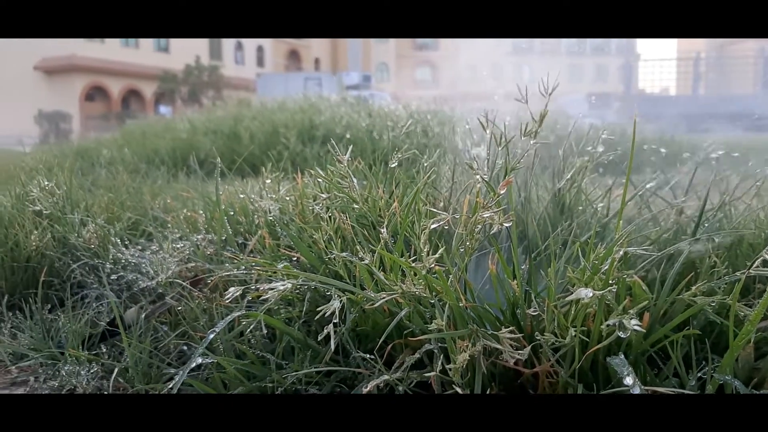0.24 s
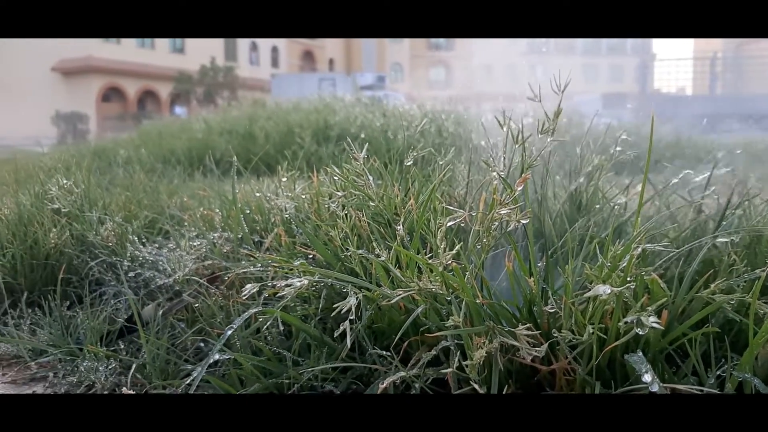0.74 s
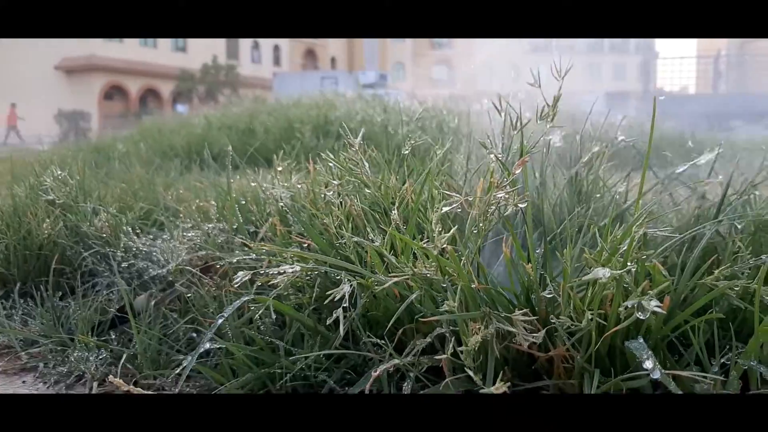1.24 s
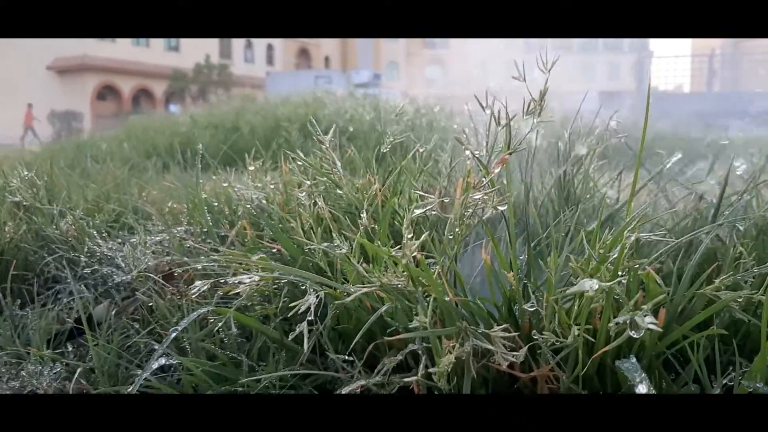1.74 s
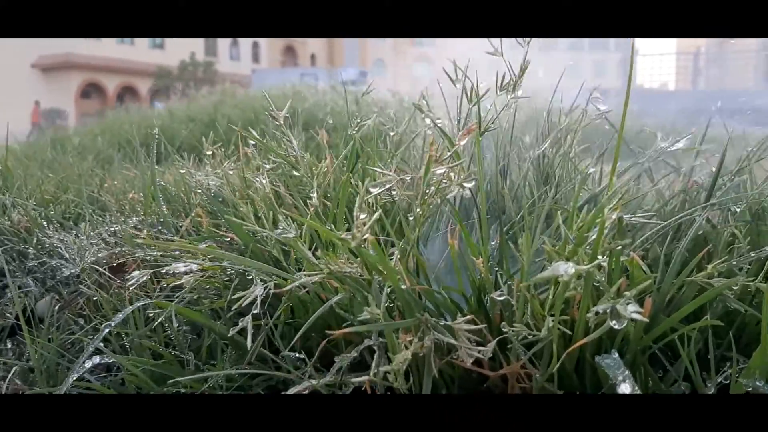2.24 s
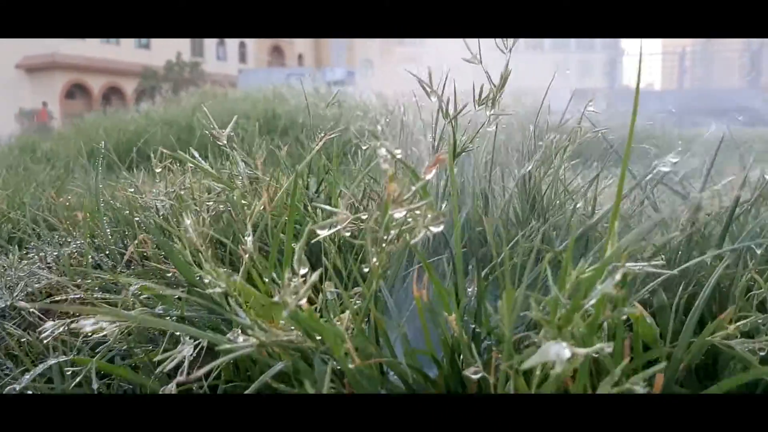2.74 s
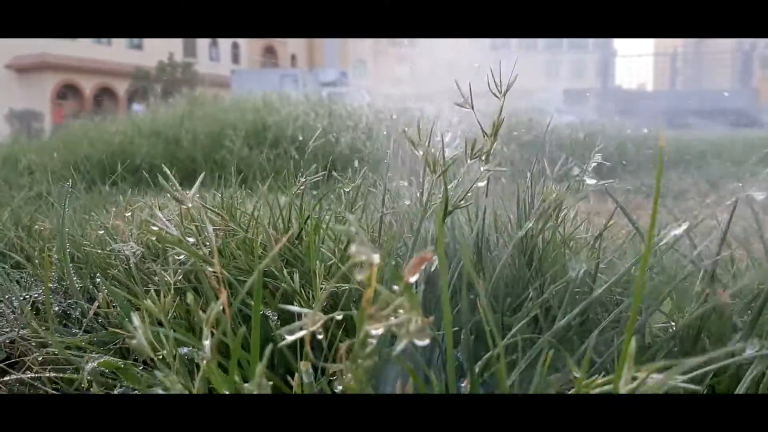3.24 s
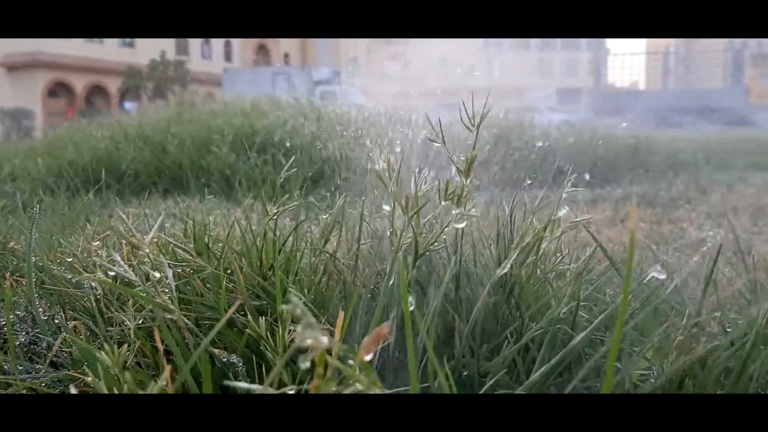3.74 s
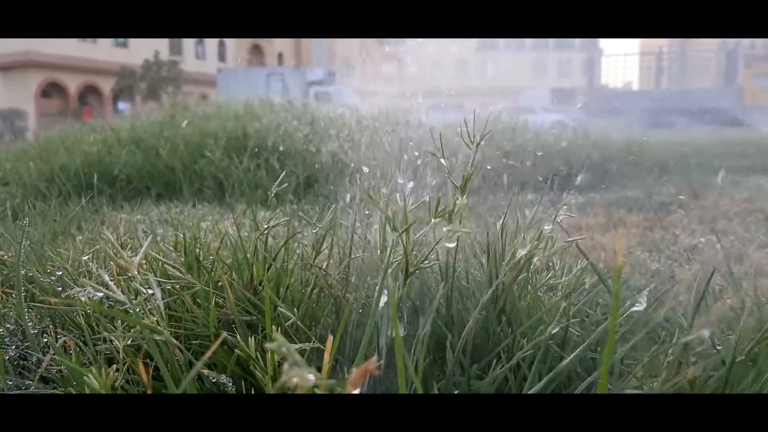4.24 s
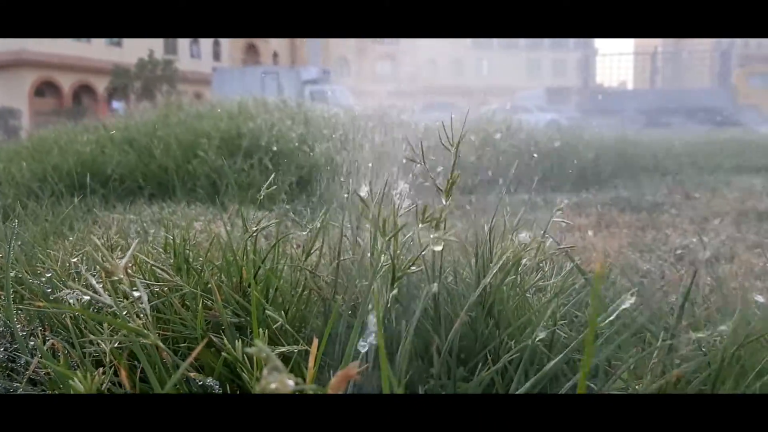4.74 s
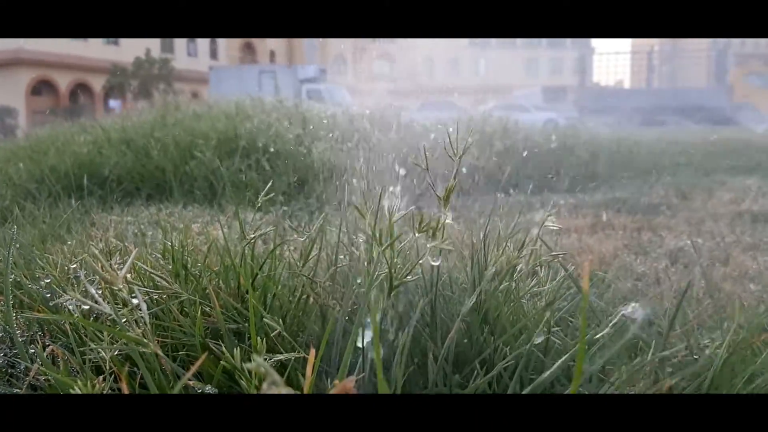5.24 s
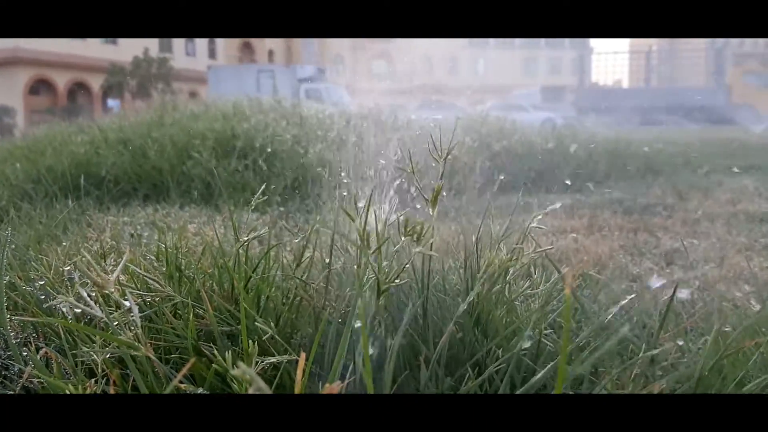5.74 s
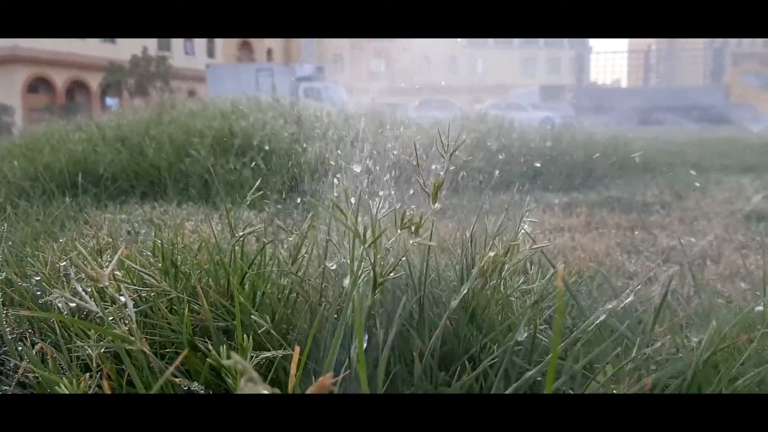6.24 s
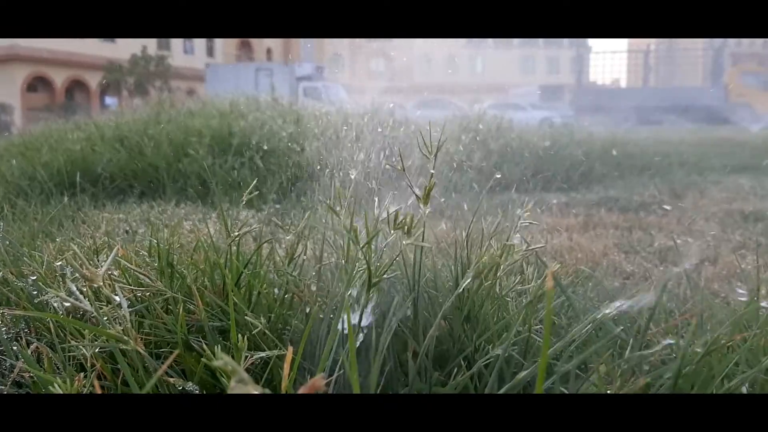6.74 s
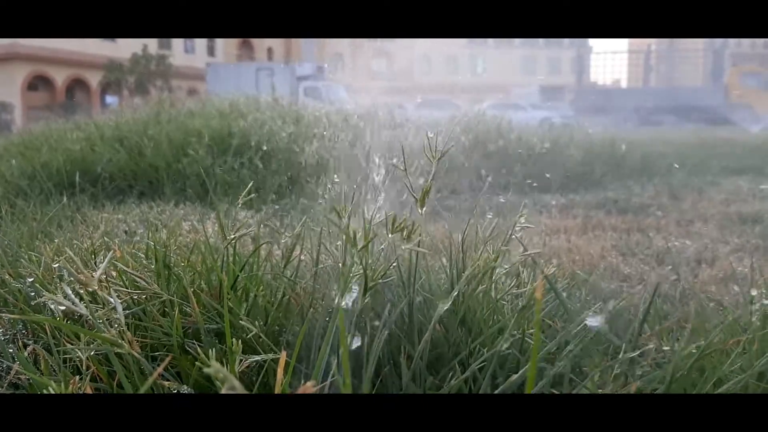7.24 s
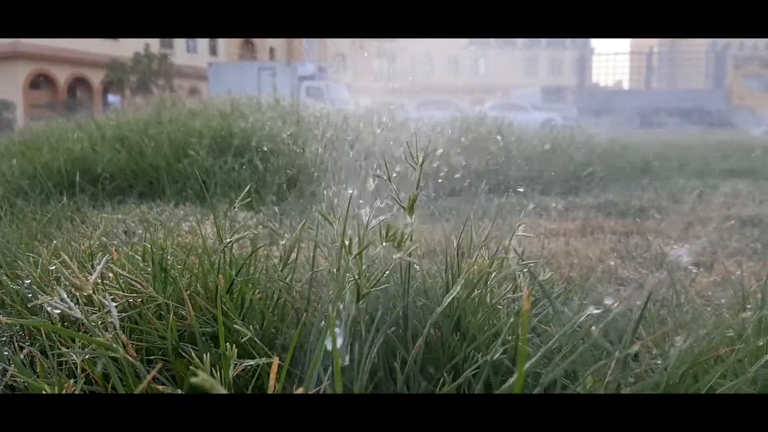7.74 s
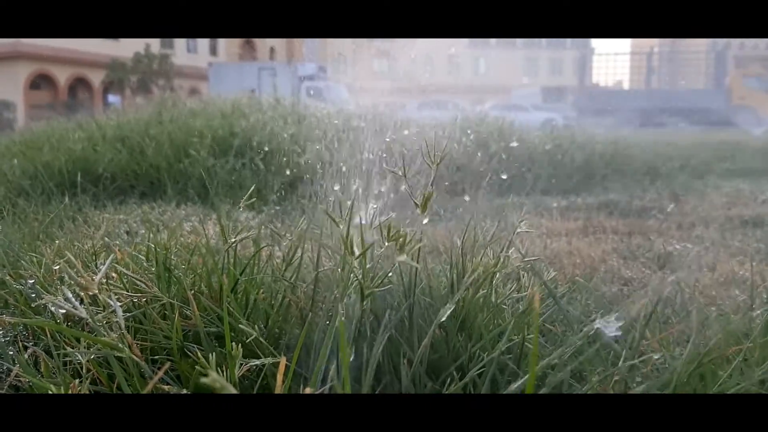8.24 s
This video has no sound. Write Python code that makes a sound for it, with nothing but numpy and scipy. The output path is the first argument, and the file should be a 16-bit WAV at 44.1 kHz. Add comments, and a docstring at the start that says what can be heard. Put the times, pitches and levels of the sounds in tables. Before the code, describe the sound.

Constant fine water spray and soft patter on wet turf, opening up after three seconds; a bird chirps twice in short series, traffic faintly rumbling.

```python
"""Lawn sprinkler heard from wet grass

A sprinkler throws a steady fan of spray: filtered noise with random impacts makes its hiss.
The microphones rise from behind a tuft of grass; drops patter on the lawn and near blades in noise washes.
A bird calls in two short series of swept, buzzing tones with echoes.
Traffic is a low noise rumble; an idling engine and one passing car are wavering tones."""
import sys
import numpy as np
from scipy import signal
from scipy.fft import rfft, irfft
from scipy.io import wavfile
from scipy.ndimage import uniform_filter1d

SR = 44100
rng = np.random.default_rng(int(sys.argv[2]) if len(sys.argv) > 2 else 0)


def put_to_file(sound):
    """Save the sound as 16-bit audio at rate SR, in the file named by the first command-line argument."""
    columns = np.atleast_2d(sound).T  # one column per channel
    safe = np.clip(columns, -1, 1)
    whole_steps = np.round(safe * 32767)
    wavfile.write(sys.argv[1], SR, whole_steps.astype(np.int16))


N = 373968
TIME = np.arange(N) / SR

# microphone move: (time [s], hidden behind the grass [0-1], nearness to the blade tips [0-1])
MOVE = [(0, 1, 0), (1.8, 0.93, 0.2), (2.45, 0.76, 0.65), (2.75, 0.46, 0.55), (3.0, 0.13, 0.86),
        (3.4, 0, 0.73), (3.9, 0.06, 0.26), (4.5, 0.05, 0.14), (8.48, 0, 0.06)]


def gain_of(db):
    """Decibels to amplitude."""
    return 10 ** (np.asarray(db) / 20)


def evened(x):
    """Scales to rms 1."""
    return x / np.sqrt(np.mean(x ** 2) + 1e-20)


def read(points, hz):
    """Spectrum table interpolated on a log-frequency axis."""
    f, value = np.transpose(points)
    return np.interp(np.log(hz + 1), np.log(f + 1), value)


def follow(rows, t):
    """Columns of a curve table at times t."""
    s, *columns = np.transpose(rows)
    return [np.interp(t, s, c) for c in columns]


def hidden(t):
    """How far the grass hides the sprinkler, 0-1."""
    return np.clip(follow(MOVE, t)[0], 0, 1)


def tip_nearness(t):
    """Nearness to the blade tips, 0-1."""
    return follow(MOVE, t)[1]


def balance(right_db):
    """Left and right gains; the right is right_db above the left."""
    return gain_of(right_db * np.array([[-.5], [.5]]))


def bumps(rows, hz):
    """Peaks and dips of a table (centre [Hz], width at half height [Hz], level [dB]), in dB."""
    return sum(db * .5 ** ((2 * (hz - f) / width) ** 2) for f, width, db in rows)


def waver(slow_hz, fast_hz):
    """Random motion of rms 1, with equal power in every octave between two rates."""
    hz = np.fft.rfftfreq(N, 1 / SR) + 1e-3
    shape = 1 / np.sqrt(hz * (1 + (slow_hz / hz) ** 4) * (1 + (hz / fast_hz) ** 4))
    return evened(irfft(rfft(rng.standard_normal(N)) * shape, N))


def patches(hz, t, wide_hz, long_s):
    """Random lumps of rms 1 over frequency and time, for uneven noise."""
    wide_bins = max(1, round(wide_hz / np.ptp(hz) * len(hz)))
    long_frames = max(1, round(long_s / t[1]))
    field = rng.standard_normal((len(hz), len(t)))
    field = uniform_filter1d(field, wide_bins, axis=0)
    return evened(uniform_filter1d(field, long_frames, axis=1))


def drops(per_s, spread_db, share):
    """Two unrelated streams of separate impacts in a wash of countless small ones (noise)."""
    size = gain_of(spread_db * np.minimum(rng.exponential(1, (2, N)), 4))
    sign = rng.choice([-1, 1], (2, N))
    impacts = size * sign * (rng.random((2, N)) < per_s / SR)
    return rng.standard_normal((2, N)) + share * evened(impacts)


def ports(streams, colour_db, same, lead_ms, size):
    """Two streams become a left-right pair; colour, likeness and the left's lead are rules of (Hz, s)."""
    overlap = size - size // 4
    hz, t, (a, b) = signal.stft(streams, SR, nperseg=size, noverlap=overlap)
    hz = hz[:, None]
    c = np.clip(same(hz, t), 0, 1)
    delay = np.exp(-2j * np.pi * hz * lead_ms(t) / 1000)
    right = (c * a + np.sqrt(1 - c ** 2) * b) * delay
    z = np.array([a, right]) * gain_of(colour_db(hz, t))
    return evened(signal.istft(z, SR, nperseg=size, noverlap=overlap)[1][:, :N])


def rumble_colour(hz, t, boom_hz=75, patchy_db=1.65, swell_db=1.3, rise_db_per_s=0.53):
    """Road rumble in slow lumps; its deep boom swells and ebbs, growing a little as traffic draws nearer."""
    # (frequency [Hz], level per Hz [dB])
    road = [(18, -24), (36, -23), (50, 0), (68, -2), (82, -1.5), (104, 0.5), (135, -6), (190, -6.5),
            (265, -15), (330, -12), (520, -23), (1200, -38.5)]
    swell = np.interp(t, TIME, waver(slow_hz=0.23, fast_hz=1.0))
    boom = swell_db * swell + rise_db_per_s * (t - t.mean())
    boom = boom / (1 + (hz / boom_hz) ** 6)
    return read(road, hz) + boom + patchy_db * patches(hz, t, wide_hz=35, long_s=.25)


def traffic(right_db=1.0, unsteady_hz=1.84, flutter_db=2):
    """A far, nearly mono rumble and the wavering firing tone of an idling engine, with its octave."""
    # left-right likeness: (frequency [Hz], likeness [0-1])
    likeness = [(30, 1), (100, 0.87), (200, 0.73), (450, 0.53), (1000, 0.51)]
    # the hum's octave: (time [s], level [dB])
    octave = [(0, -50.5), (2, -62), (6.0, -57), (7.4, -54.5), (8.2, -46.5)]
    street_db, firing_hz, firing_db = -38.5, 97.55, -49
    noise = rng.standard_normal((2, N))
    rumble = ports(noise, rumble_colour, lambda hz, t: read(likeness, hz), lambda t: 0, size=4096)
    hz = firing_hz + unsteady_hz * waver(slow_hz=0.65, fast_hz=8.5)
    angle = 2 * np.pi * np.cumsum(hz) / SR
    hum = gain_of(firing_db) * np.sin(angle)
    hum = hum + gain_of(follow(octave, TIME)[0]) * np.sin(2 * angle)
    hum = np.sqrt(2) * hum * gain_of(flutter_db * waver(slow_hz=0.55, fast_hz=6.0))
    return (rumble * gain_of(street_db) + hum) * balance(right_db)


def passing_car(unsteady_hz=0.57, flutter_db=2):
    """A far car drives by: its exhaust note sinks by Doppler shift and is loudest as it passes."""
    nearest_s, span_s = 3.65, 0.96  # span: time to cover its nearest distance
    exhaust_hz, doppler_hz, nearest_db = 104.6, 13, -48
    along = (TIME - nearest_s) / span_s
    distance = np.sqrt(1 + along ** 2)  # nearest = 1
    hz = exhaust_hz - doppler_hz * along / distance + unsteady_hz * waver(slow_hz=0.64, fast_hz=12)
    level_db = nearest_db + flutter_db * waver(slow_hz=0.92, fast_hz=14)
    return np.sqrt(2) * gain_of(level_db) / distance * np.sin(2 * np.pi * np.cumsum(hz) / SR)


def bird(left_db=6, direct=0.46, wet=0.67):
    """Each chirp slips down onto a held, buzzing note; most then fall in pitch as the buzz fades; echoes."""
    # one row a call, level ahead of the direct/echo mix:
    # (start [s], length [s], final pitch fall [Hz], buzz depth [Hz], level [dB])
    chirps = [(2.445, .1, 0, 140, -42), (2.83, .1, 120, 140, -41.8), (3.262, .082, 60, 130, -43),
              (3.64, .095, 30, 150, -43), (4.06, .08, 500, 200, -48), (7.292, .113, 950, 340, -41.3),
              (7.672, .105, 850, 320, -41.8), (8.062, .098, 850, 350, -41), (8.432, .1, 900, 200, -41.5)]
    held_hz, slip_hz, trill_hz = 2970, 520, 130  # slip: start above the held pitch
    slip_end, hold_end = .3, .66  # share of the call's length
    voice, rasp = np.zeros(N), waver(slow_hz=80, fast_hz=200)
    trill_rate_hz = trill_hz * (1 + .1 * waver(slow_hz=5, fast_hz=40))
    trill = np.sin(2 * np.pi * np.cumsum(trill_rate_hz) / SR)
    for s, length, fall_hz, buzz_hz, level_db in chirps:
        part = (TIME >= s) & (TIME < s + length)
        u = (TIME[part] - s) / length
        slip = np.clip(1 - u / slip_end, 0, 1)
        fall = np.clip((u - hold_end) / (1 - hold_end), 0, 1)
        buzz = (1 - slip) * (1 - fall ** 2) * (trill[part] + .5 * rasp[part])
        hz = held_hz + slip_hz * slip - fall_hz * fall + buzz_hz * buzz
        swell = np.sin(np.pi * u ** 1.25) ** .7 * (1 + .3 * buzz)
        tone = np.sin(2 * np.pi * np.cumsum(hz) / SR)
        voice[part] += gain_of(level_db) * np.sqrt(2) * swell * tone
    t, t60_s = TIME[:SR // 2], .1
    sparse = rng.random((2, len(t))) < .04
    taps = rng.standard_normal((2, len(t))) * sparse * gain_of(-60 * t / t60_s)
    taps = taps / np.linalg.norm(taps[0])
    echo = signal.fftconvolve(voice[None], taps, axes=1)[:, :N]
    return (direct * voice + wet * echo) * balance(-left_db)


def hollow(hz, t, ring_hz=1495, shift_hz=60, width_hz=130, ring_db=4):
    """One hollow resonance that rises a little in pitch near the blade tips, in dB."""
    return bumps([(ring_hz + shift_hz * tip_nearness(t), width_hz, ring_db)], hz)


def lawn(right_db=2, lead_ms=0.12, patchy_db=2.5):
    """Spray lands on the turf in a soft, lumpy wash with one hollow resonance."""
    # (frequency [Hz], level per Hz [dB])
    turf = [(150, -25), (450, -2), (700, -3.5), (1150, -2.5), (1350, -2), (1640, -1), (2000, -2.5),
            (2200, -1.5), (3000, -30), (5000, -20)]
    # left-right likeness: (frequency [Hz], likeness [0-1])
    likeness = [(200, 0.49), (550, 0.62), (1500, 0.63), (2000, 0.18), (2600, 0.22)]
    # the wash's upper edge: (time [s], level [dB])
    edge = [(3.5, -0.5), (5, -1.5), (6.2, -1), (7.2, 2.5), (8.2, 3.5)]
    edge_hz, edge_width_hz = 2400, 960
    open_db, tuft_loss_db = -41, 1.4

    def colour(hz, t):
        upper_edge = bumps([(edge_hz, edge_width_hz, follow(edge, t)[0])], hz)
        lumps = patchy_db * patches(hz, t, wide_hz=110, long_s=0.09)
        return read(turf, hz) + hollow(hz, t) + upper_edge + lumps

    streams = drops(per_s=450, spread_db=4.5, share=0.3)
    wash = ports(streams, colour, lambda hz, t: read(likeness, hz),
                 lambda t: lead_ms * (1 - hidden(t)), size=1024)
    return wash * gain_of(open_db - tuft_loss_db * hidden(TIME)) * balance(right_db)


def blades(level_db=-44, same=0.97, in_open=0.04, patchy_db=3.0):
    """Drops tick on the tuft straight ahead, fading as the microphones clear it."""
    # (frequency [Hz], level per Hz [dB])
    ticks = [(1600, -11), (2300, -6), (2750, 0), (3100, -4.5), (3500, -8), (4300, -2.5), (5200, -35)]

    def colour(hz, t):
        return read(ticks, hz) + patchy_db * patches(hz, t, wide_hz=250, long_s=0.041)

    streams = drops(per_s=550, spread_db=-2.5, share=0.38)
    patter = ports(streams, colour, lambda hz, t: same, lambda t: 0, size=512)
    nearness = in_open + (1 - in_open) * hidden(TIME)
    return patter * nearness * gain_of(level_db)


def hiss_colour(hz, t, mist_db=0.84, flicker_db=3.6):
    """Each port's open hiss, dulled behind the grass and brightened at its tips; its low edge flickers."""
    # open hiss in each microphone port: (frequency [Hz], level per Hz [dB])
    left = [(1500, -25), (3300, -17.5), (3850, -14.5), (5000, -7), (5800, -2.5), (6700, -9.5), (7950, -6),
            (8600, -18), (10300, -12.5), (11500, -7.5), (12450, -4), (14000, -7), (15700, -14)]
    right = [(1800, -28), (3100, -18.5), (4080, -11.5), (4300, -7.5), (4650, 0), (5620, 3), (6250, -3),
             (6750, -1.5), (7550, -13.5), (8100, -32), (9600, -25.5), (11100, -15.5), (12000, -11),
             (12700, -25), (15700, -16.5)]
    # change behind the grass, change at the blade tips: (frequency [Hz], level [dB])
    screen = [(3800, 0.5), (4800, -6.5), (5700, -7.5), (6400, -2), (7500, -4), (8700, -0.5), (10200, 2),
              (11000, 3.5), (12500, 0.5), (15500, 1)]
    tips = [(3000, 9.5), (4200, 0.5), (5800, 0.5), (7200, 9), (9000, 4.5), (10100, 4.5), (10900, 9),
            (12400, 3), (15500, 6.5)]
    in_ports = np.array([read(left, hz), read(right, hz)])
    grass = hidden(t) * read(screen, hz) + tip_nearness(t) * read(tips, hz)
    mist = mist_db * patches(hz, t, wide_hz=1520, long_s=0.022)
    flicker = flicker_db * patches(hz, t, wide_hz=180, long_s=.045) / (1 + (hz / 4300) ** 16)
    return in_ports + grass + mist + flicker


def spray(surge_db=0.46, sputter_db=0.45, lead_ms=.18, scatter=1.0):
    """The jet tears into droplets, surges with pressure and sputters; blades screen and scatter its sound."""
    # left-right likeness: (frequency [Hz], likeness [0-1])
    likeness = [(2500, 0), (4000, 1), (4900, 0.38), (5700, 0.48), (7200, 1), (8200, 0), (12000, 0),
                (15700, .15)]
    open_db, grass_loss_db = -29, 5
    streams = drops(per_s=1500, spread_db=2.0, share=0.34)
    hiss = ports(streams, hiss_colour, lambda hz, t: read(likeness, hz) * (1 - scatter * hidden(t)),
                 lambda t: lead_ms * (1 - .5 * hidden(t)), size=512)
    steady = hiss / np.sqrt(uniform_filter1d(hiss.mean(0) ** 2, size=6000))
    surge = surge_db * waver(slow_hz=1, fast_hz=10)
    sputter = sputter_db * waver(slow_hz=21, fast_hz=130)
    return steady * gain_of(open_db - grass_loss_db * hidden(TIME) + surge + sputter)


def reflections(water):
    """Near reflections cancel narrow bands: one set low in the grass, another above it in each port."""
    # (centre [Hz], width [Hz], level [dB])
    tuft_dips = [(2310, 100, -18), (2614, 66, -15), (4440, 79, -2), (4900, 170, -3.5)]
    left_dips = [(2160, 150, -15), (3640, 120, -2)]
    right_dips = [(2500, 130, -10), (3050, 400, -1.5), (4100, 98, -4)]
    hz, t, z = signal.stft(water, SR, nperseg=2048, noverlap=1536)
    hz = hz[:, None]
    low_db = hidden(t) * (1 - tip_nearness(t)) * bumps(tuft_dips, hz)
    open_db = (1 - hidden(t)) * np.array([bumps(left_dips, hz), bumps(right_dips, hz)])
    return signal.istft(z * gain_of(low_db + open_db), SR, nperseg=2048, noverlap=1536)[1][:, :N]


def scene():
    """Water close by; bird and street far off."""
    water = reflections(spray() + lawn() + blades())
    return water + bird() + traffic() + passing_car()


def record(dry):
    """Each port's narrow resonances and dips, then the band limit."""
    # (centre [Hz], width [Hz], level [dB])
    left_port = [(6600, 580, 0), (9040, 950, 4), (12500, 520, 2), (15600, 550, 4.5)]
    right_port = [(2520, 100, 0), (3860, 380, 1.5), (8600, 700, -12), (10000, 700, 3.5), (12900, 300, -4),
                  (13400, 280, 5)]
    edge_hz = 15850
    hz = np.fft.rfftfreq(N, 1 / SR)
    port_db = [bumps(left_port, hz), bumps(right_port, hz)]
    heard = irfft(rfft(dry) * gain_of(port_db), N)
    lowpass = signal.firwin(701, edge_hz, window=("kaiser", 9), fs=SR)
    return signal.oaconvolve(heard, lowpass[None], "same")


dry = scene()
out = record(dry)
put_to_file(out)
```